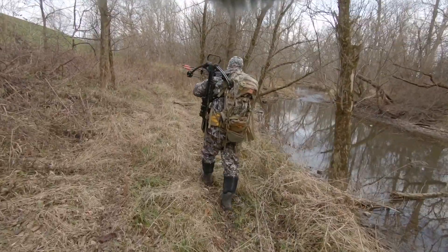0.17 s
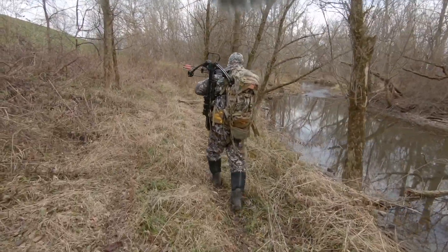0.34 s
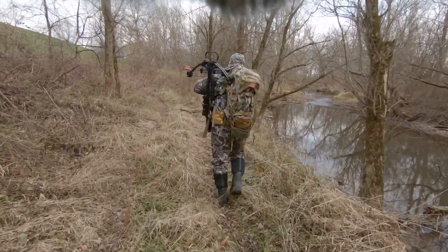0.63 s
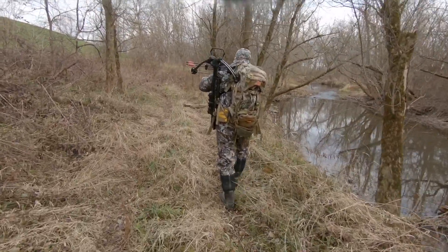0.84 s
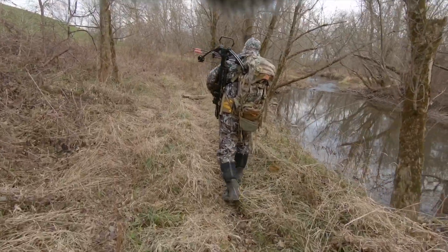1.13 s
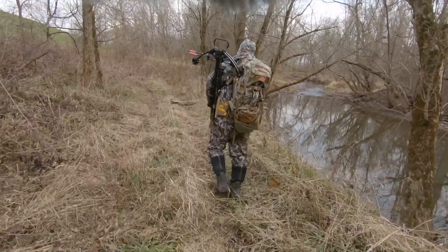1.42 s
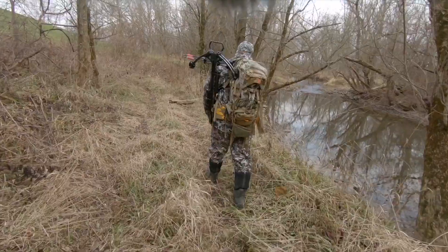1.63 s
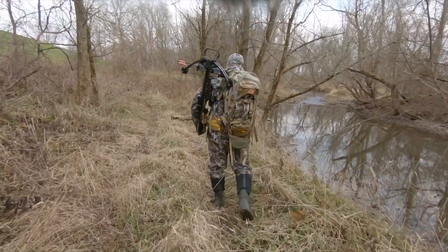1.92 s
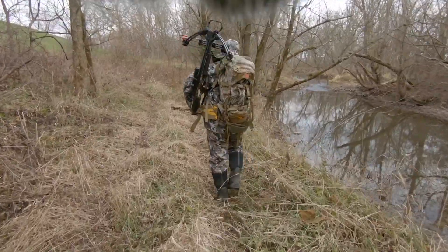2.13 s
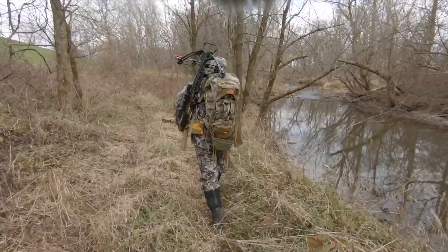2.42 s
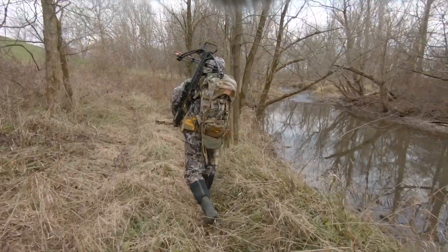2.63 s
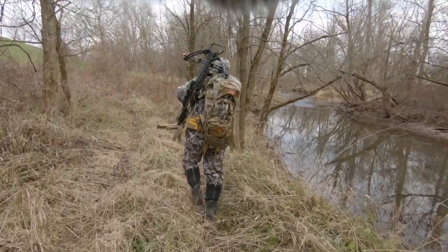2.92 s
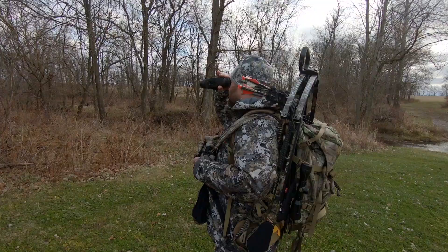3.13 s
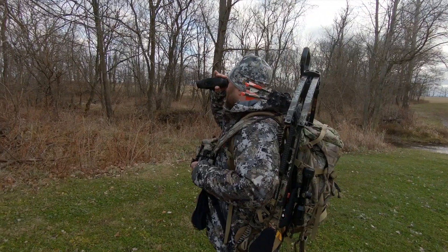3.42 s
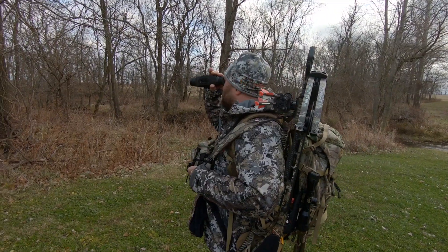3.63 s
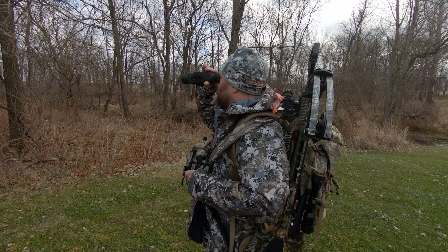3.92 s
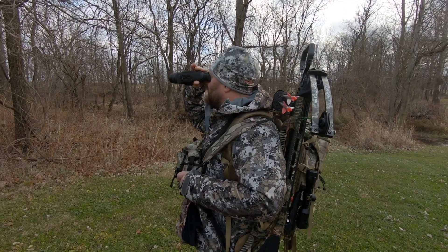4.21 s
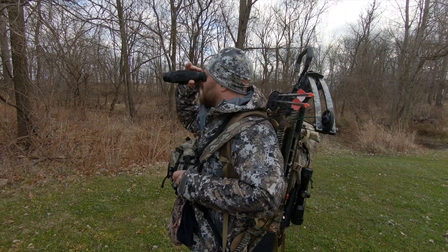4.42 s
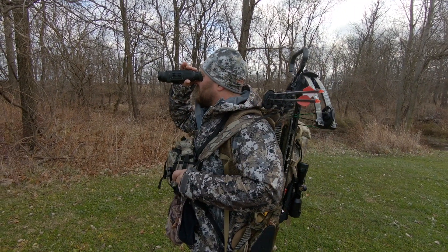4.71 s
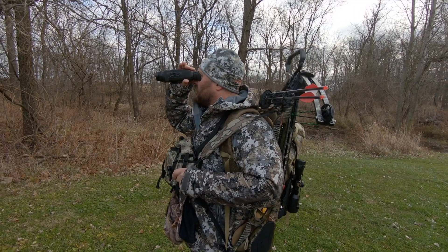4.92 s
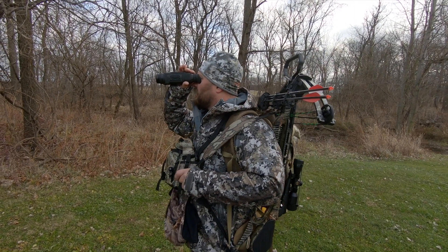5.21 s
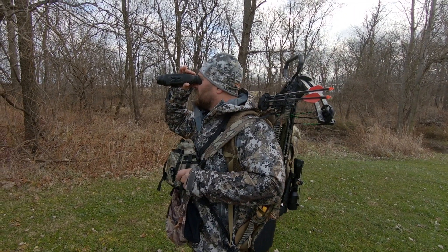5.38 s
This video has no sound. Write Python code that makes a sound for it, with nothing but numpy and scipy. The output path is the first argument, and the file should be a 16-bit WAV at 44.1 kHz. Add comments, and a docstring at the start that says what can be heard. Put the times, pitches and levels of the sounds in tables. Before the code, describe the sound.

Footsteps wade through crackling dry grass with twig snaps and dull thuds, giving way suddenly to quiet outdoor air and soft clothing rustle.

```python
"""Boots wade through long dry grass on a wooded creek bank: blades swish and stems crackle.
Twigs snap, soles thud on soft ground, and air pockets pop in the wet soil.
Then the scene changes abruptly to a quiet field edge, where the walker stands and his jacket rustles.
Throughout, slow air buffets the microphone and far traffic hums; the sound is almost mono."""
import sys
import numpy as np
from scipy.fft import rfft, irfft, next_fast_len
from scipy.io import wavfile
from scipy.ndimage import map_coordinates

SR = 44100
rng = np.random.default_rng(int(sys.argv[2]) if len(sys.argv) > 2 else 0)


def digitize_waveform(pressure):
    """Quantize a signal to 16-bit integers and store it at the path in sys.argv[1].

    Rows of a 2-D input are taken as channels; values are limited to [-1, 1].
    """
    field = np.atleast_2d(pressure).T
    bounded = np.clip(field, -1, 1)
    quanta = np.round(bounded * 32767).astype(np.int16)
    wavfile.write(sys.argv[1], SR, quanta)


N = 244755
TIME = np.arange(N) / SR
CHANGE_S = 3.167
WALKING = np.clip((CHANGE_S - TIME) / .002, 0, 1)  # 1 on the creek bank, 0 at the field edge


def amp(db):
    """Turn decibels into a gain."""
    return 10 ** (np.asarray(db) / 20)


def unit(x):
    """Scale to an average (rms) level of 1."""
    return x / np.sqrt(np.mean(x ** 2) + 1e-20)


def wobble(rate):
    """A smooth curve through rate random points a second."""
    return map_coordinates(rng.standard_normal(int(N * rate / SR) + 4), [TIME * rate])


def filtered(x, response):
    """Multiply each frequency f in x by response(f)."""
    size = next_fast_len(x.shape[-1] + 8192)
    return irfft(rfft(x, size) * response(np.fft.rfftfreq(size, 1 / SR)), size)[..., :x.shape[-1]]


def gains(tone, f):
    """Read the gain at frequencies f from a tone table."""
    hz, db = np.transpose(tone)
    return amp(np.interp(np.log(f + 1), np.log(hz), db))


def coloured(x, tone):
    """Shape x with a tone table, then scale it to level 1."""
    return unit(filtered(x, lambda f: gains(tone, f)))


def resonance(f, hz, width):
    """A filter that rings at hz; a narrow one rings longer."""
    return 1j * f * width / (hz * hz - f * f + 1j * f * width)


def add(track, s, sound):
    """Mix a sound into the track at s seconds."""
    room = track[max(round(s * SR), 0):][:len(sound)]
    room += sound[:len(room)]


def strokes(rows, rise_s, fall_s):
    """Summed power of movements that swell, hold and fade, by 20 dB per rise or fall time."""
    power = 0
    for s, hold, db in rows:
        fade = np.maximum(s - TIME, 0) / rise_s + np.maximum(TIME - s - hold, 0) / fall_s
        power += amp(db - 20 * fade) ** 2
    return power


def crackle(rate, spread_db, tick_share, clump_db):
    """Countless tiny contacts blur into a hiss, with louder ticks on top; both come in clumps."""
    ticks = (rng.random(N) < rate / SR) * rng.standard_normal(N)
    ticks *= amp(spread_db * np.minimum(rng.exponential(size=N), 3))
    mix = np.sqrt(tick_share) * unit(ticks) + np.sqrt(1 - tick_share) * rng.standard_normal(N)
    return mix * amp(clump_db * (1.38 * wobble(45) + 1.02 * wobble(190)))


# Tone of crushed stems, sliding blades and dry tips: (frequency [Hz], relative level [dB])
STEM_TONE = [(80, 0.5), (160, -6), (280, -3.5), (450, -0.5), (1000, -1.5), (2000, -0.5), (3200, -1),
             (5400, -0.5), (7000, 1.5), (10000, -30)]
BLADE_TONE = [(2000, -16), (4300, -3), (6000, 0), (7200, 1.5), (8500, -5.5), (10500, -4), (12500, -6),
              (16000, -20)]
TIP_TONE = [(5000, -29.5), (7200, -4.5), (8200, -0.5), (9000, -4.5), (9900, -17), (11200, -10),
            (12800, -4.5), (14500, -11), (16000, -9)]
# A boot swings through the blades: (time [s], hold [s], swish level [dB])
SWINGS = [(.165, 0.017, -51.5), (.225, .125, -45), (.975, 0.045, -45.5), (1.14, 0.044, -50),
          (1.645, 0.056, -47.5), (2.37, 0.074, -43), (3.05, 0.037, -42.5), (3.15, .02, -47)]
# Weight comes down on the grass: (time [s], hold [s], stem level [dB], tip level [dB])
TREADS = [(0.034, 0.04, -51, -50.5), (0.435, 0.086, -54, -49), (0.555, 0.12, -51, -46),
          (.735, 0.064, -47, -47), (0.976, 0.12, -47.5, -57), (1.34, .07, -52, -49),
          (1.453, 0.057, -48.5, -44.5), (1.584, 0.27, -53, -53.5), (1.909, 0.067, -52.5, -48.5),
          (2.022, 0.12, -59, -53), (2.185, 0.092, -48.5, -48), (2.528, 0.097, -54.5, -52),
          (2.682, 0.021, -49, -45.5), (2.772, 0.1, -56.5, -52), (2.908, 0.089, -53.5, -48),
          (3.076, 0.1, -53, -50)]


def grass():
    """Stems crackle under the sole while blades and their dry tips slide along the boots."""
    swing = strokes(SWINGS, rise_s=.067, fall_s=.076)
    press = strokes([(s, hold, db) for s, hold, db, _ in TREADS], rise_s=.1, fall_s=.077)
    flick = strokes([(s, hold, db) for s, hold, _, db in TREADS], rise_s=.1, fall_s=.077)
    # The steady last terms are trodden grass stirring between steps.
    crush = np.sqrt(press + swing * amp(-6) ** 2 + amp(-57) ** 2)
    swish = np.sqrt(swing + press * amp(-2) ** 2 + amp(-59.5) ** 2)
    fizz = np.sqrt(flick + swing * amp(-15.5) ** 2 + amp(-57) ** 2)
    contacts = crackle(rate=2200, spread_db=2.6, tick_share=.25, clump_db=1.1)
    sliding = crackle(rate=3000, spread_db=2.5, tick_share=.2, clump_db=.8)
    stems = unit(filtered(coloured(contacts, STEM_TONE), lambda f: 1 / (1 + (f / 5200) ** 6)))
    return crush * stems + swish * coloured(sliding, BLADE_TONE) + fizz * coloured(contacts, TIP_TONE)


# Tone of the rumble: (frequency [Hz], relative level [dB])
RUMBLE_TONE = [(20, -11), (70, -5), (110, 5), (160, -27), (400, -26), (1500, -71)]


def rumble():
    """A faint, low noise lies under the walk."""
    return amp(-66) * coloured(rng.standard_normal(N), RUMBLE_TONE)


# How the air swells and sinks: (time [s], level before the boost [dB])
GUSTS = [(0.0, -48), (0.34, -48.5), (0.46, -39.5), (0.66, -38.5), (0.72, -43), (0.98, -44.5), (1.16, -39),
         (1.24, -40.5), (1.73, -50), (1.88, -39), (2.47, -52), (2.66, -42), (2.99, -50), (3.17, -47.5),
         (3.32, -62.5), (3.55, -57), (5.44, -58.5), (5.5, -52.5)]
# Tone of the air: (frequency [Hz], relative level [dB])
AIR_TONE = [(3, 2), (6, 4), (10, -6.5), (14, -4.5), (20, -9), (27, -17), (36, -46), (60, -39.5),
            (150, -59.5), (400, -120)]


def air(boost_db=14.5):
    """Slow air pushes on the microphone, a different draught in each place."""
    at_creek, at_field = coloured(rng.standard_normal((2, N)), AIR_TONE)
    gust_db = np.interp(TIME, *np.transpose(GUSTS))
    return amp(gust_db + boost_db) * (WALKING * at_creek + (1 - WALKING) * at_field)


# Tone of distant traffic and woods: (frequency [Hz], relative level [dB])
DISTANT_TONE = [(24, -29), (40, 3), (80, -1), (115, -5.5), (145, -15), (260, -13.5), (500, -16.5),
                (850, -16.5), (1250, -18.5), (1900, -28.5), (3000, -30.5), (7600, -37.5), (15800, -38)]
# Far engines and tyres: (pitch [Hz], width [Hz], level [dB])
HUMS = [(69.7, 3.9, -69), (110.2, 17, -79), (214.6, 18, -73), (840, 98, -79.5)]


def traffic():
    """Far traffic blends into a soft wash; narrow bands of noise make its wavering hum."""
    out = amp(-61 + .21 * wobble(8.6)) * coloured(rng.standard_normal(N), DISTANT_TONE)
    for hz, width, db in HUMS:
        out += amp(db) * unit(filtered(rng.standard_normal(N), lambda f: resonance(f, hz, width) ** 2))
    return out


# Twigs and stalks break: (time [s], level of the first 4 ms [dB], pitch [Hz], 60 dB splinter fade [s])
SNAPS = [(0.0722, -39, 11000, 0.008), (0.3926, -41.5, 1700, 0.014), (0.453, -46.5, 4000, 0.011),
         (0.559, -40.5, 5160, 0.014), (0.789, -29.5, 5850, 0.024), (0.9595, -34.5, 11500, 0.026),
         (1.0775, -28.5, 3760, 0.032), (1.091, -42.5, 3200, 0.035), (1.107, -35.5, 3300, 0.019),
         (1.1162, -38, 2900, 0.022), (1.13, -40.5, 2900, 0.066), (1.1382, -35, 3000, 0.01),
         (1.1433, -37.5, 3000, 0.028), (1.15, -40, 2700, 0.042), (1.198, -33, 2110, 0.021),
         (1.2248, -35.5, 4900, 0.017), (1.2766, -40, 3000, 0.012), (1.853, -41.5, 4500, 0.013),
         (1.959, -43, 10000, 0.06), (2.1648, -37, 9000, 0.013), (2.1846, -36.5, 3940, 0.028),
         (2.2158, -35.5, 5770, 0.038), (2.2228, -36.5, 4840, 0.04), (2.278, -41, 3850, 0.024),
         (2.335, -41, 4800, 0.023), (2.677, -36.5, 5700, 0.032), (2.6932, -35.5, 12000, 0.022),
         (3.327, -60, 9000, 0.025), (3.607, -56.5, 5800, 0.014)]
# Notes a thick dry stick rings at: (pitch [Hz], width [Hz], relative level [dB])
STICK_NOTES = [(2030, 660, 2), (2480, 300, -3), (2860, 160, 3.5), (3420, 270, 2.5), (4860, 350, -7),
               (6460, 900, -3)]


def twigs(crack_s=.003, splinter_db=-9, brittle_s=.034, thick_hz=4000, ring_db=4, dull_hz=14000):
    """Each break is a sharp crack and a spray of tearing fibres; thick, low-pitched sticks also ring."""
    out, t = np.zeros(N), np.arange(SR // 12) / SR
    wood = lambda f: sum(amp(db + ring_db) * resonance(f, hz, width) for hz, width, db in STICK_NOTES)
    for s, db, hz, fade_s in SNAPS:
        brittle = 1 / (1 + (fade_s / brittle_s) ** 6)  # stalks that give way slowly only crunch
        crack = brittle * amp(-60 * t / crack_s)
        splinters = amp(splinter_db - 60 * t / fade_s)
        force = np.tanh(rng.standard_normal(len(t))) * (crack + splinters)
        force[0] += 1.2 * brittle  # the opening click
        thick = 1 / (1 + (hz / thick_hz) ** 6)
        body = lambda f: resonance(f, hz, 1.4 * hz) + thick * wood(f)
        snap = filtered(force, lambda f: body(f) / (1 + (f / dull_hz) ** 6))
        add(out, s, amp(db) * snap / np.std(snap[:int(.004 * SR)]))
    return out


# Soles meet soft ground and buried sticks: (time [s], level [dB], pitch [Hz])
THUDS = [(0.3927, -18.5, 573), (0.492, -31.5, 475), (0.784, -39.5, 229), (0.957, -38.5, 258),
         (0.983, -42, 356), (1.062, -28, 734), (1.198, -24, 640), (1.226, -27.5, 880), (1.439, -35, 355),
         (2.125, -31, 457), (2.68, -42.5, 137), (2.702, -38, 240)]


def soles(scuff_gain=.24, scuff_ratio=1.8, attack_s=.00067, fade_cycles=6):
    """A dull knock dies away quickly, with a little scuffing noise above its pitch."""
    out, t = np.zeros(N), np.arange(SR // 10) / SR
    for s, db, hz in THUDS:
        scuff_hz = scuff_ratio * hz
        scuff = unit(filtered(rng.standard_normal(len(t)), lambda f: resonance(f, scuff_hz, scuff_hz) ** 2))
        loudness = amp(db - 60 * t * hz / fade_cycles) * (1 - np.exp(-t / attack_s))
        add(out, s, loudness * (np.sin(2 * np.pi * hz * t) + scuff_gain * scuff))
    return out


# Water is pressed out of the soil: (time [s], hold [s], level [dB])
SQUELCHES = [(1.83, 0.03, -52.5), (2.02, .13, -52.5)]


def mud(count=150, low_hz=200, high_hz=1900, fade_cycles=11, ramp_s=.12):
    """Small air pockets pop in the wet soil; the large, low ones ring longer."""
    out, t = np.zeros(N), np.arange(SR // 12) / SR
    start = SQUELCHES[0][0] - ramp_s
    span = SQUELCHES[-1][0] + SQUELCHES[-1][1] + ramp_s - start
    for when, smallness, strength in rng.random((count, 3)):
        hz = low_hz * (high_hz / low_hz) ** smallness
        pop = np.sin(2 * np.pi * hz * t) * amp(-60 * t * hz / fade_cycles) * (1 - np.exp(-t * hz))
        add(out, start + when * span, amp(10 * strength + 6.7 * smallness) * pop)
    return unit(out) * np.sqrt(span / TIME[-1] * strokes(SQUELCHES, ramp_s, ramp_s))


# An arm moves: (time [s], hold [s], level [dB])
ARM_MOVES = [(3.235, 0.039, -57), (3.52, 0.11, -68), (3.965, 0.057, -60), (5.21, .07, -77)]
# Tone of rubbing cloth: (frequency [Hz], relative level [dB])
CLOTH_TONE = [(150, -19), (300, -2), (650, 0), (1300, -0.5), (2500, -2), (5000, -3.5), (8300, -2),
              (11000, -8.5), (15800, -14)]


def jacket(stir_db=-70, fade_db_per_s=4.5):
    """Sleeve and pack straps slide over the jacket; its faint stirring dies down as the walker stands."""
    stir = amp(stir_db - fade_db_per_s * (TIME - CHANGE_S))
    rub = np.sqrt(strokes(ARM_MOVES, rise_s=.11, fall_s=.06) + stir ** 2)
    weave = crackle(rate=1900, spread_db=2, tick_share=.08, clump_db=.6)
    return rub * coloured(weave, CLOTH_TONE)


# Stereo width: (frequency [Hz], side level relative to the middle [dB])
STEREO_WIDTH = [(60, -65), (300, -29), (2000, -57), (7500, -60), (15000, -50)]


def scene():
    """The walk, then the standing pause; left and right sound almost alike."""
    walk = rumble() + grass() + mud()
    middle = WALKING * walk + (1 - WALKING) * jacket() + twigs() + soles() + air() + traffic()
    side = filtered(middle, lambda f: 1j * gains(STEREO_WIDTH, f))
    return np.array([middle + side, middle - side])


def record(dry):
    """Cut away the very highest treble, above about 16 kHz."""
    return filtered(dry, lambda f: 1 / (1 + (f / 15950) ** 200))


dry = scene()
out = record(dry)
digitize_waveform(out)
```